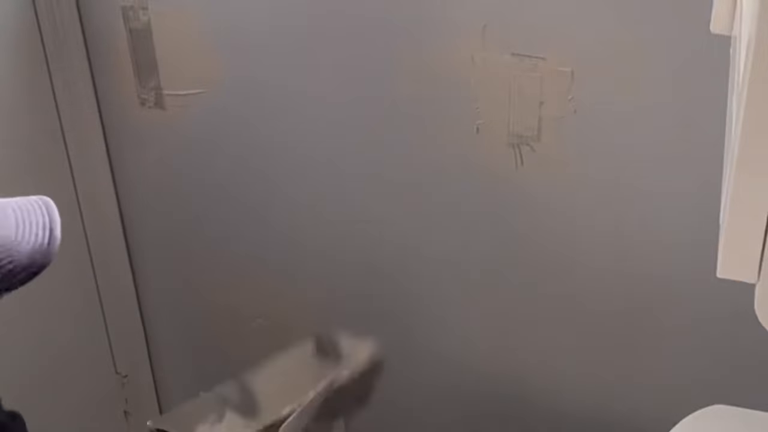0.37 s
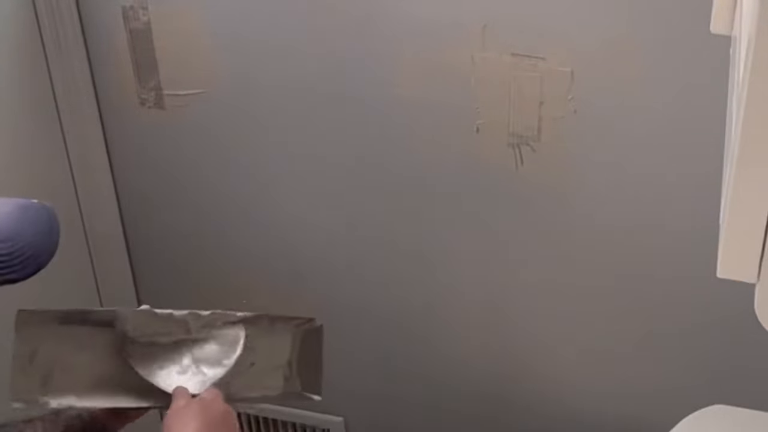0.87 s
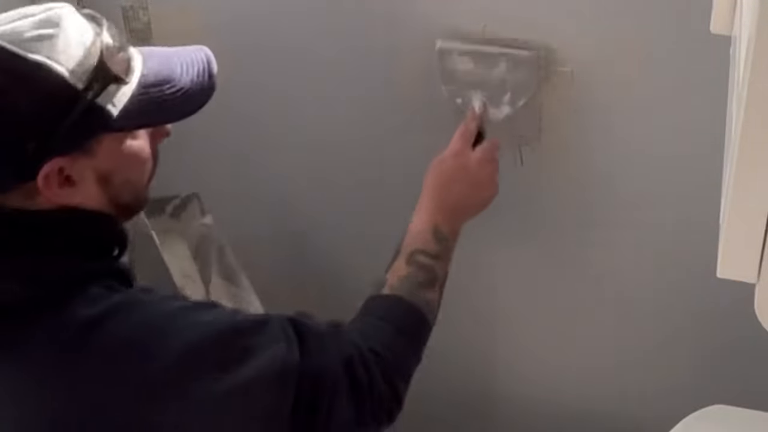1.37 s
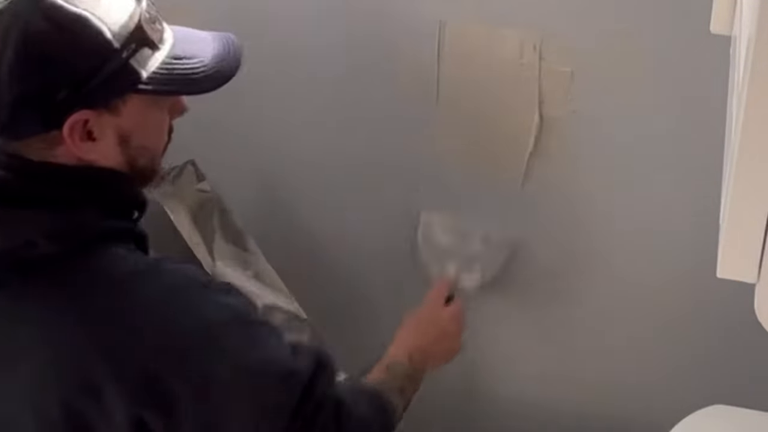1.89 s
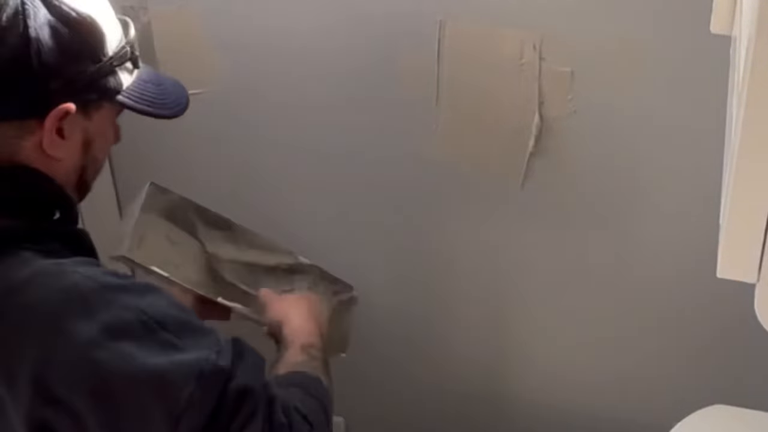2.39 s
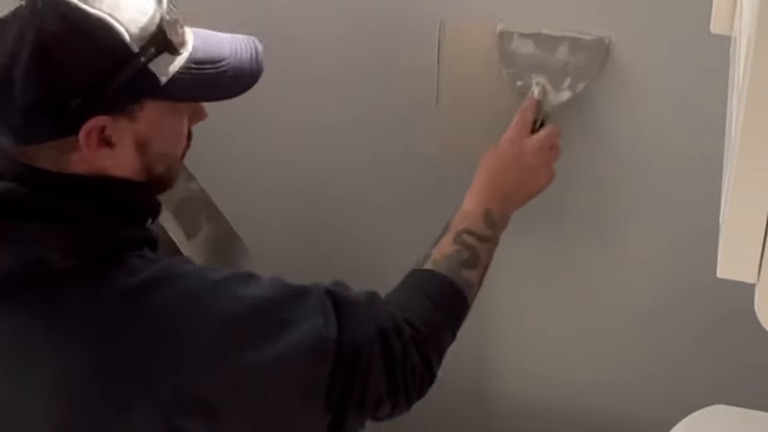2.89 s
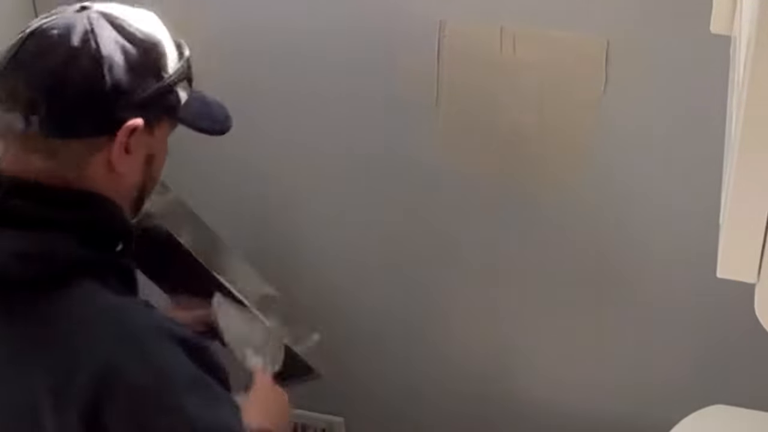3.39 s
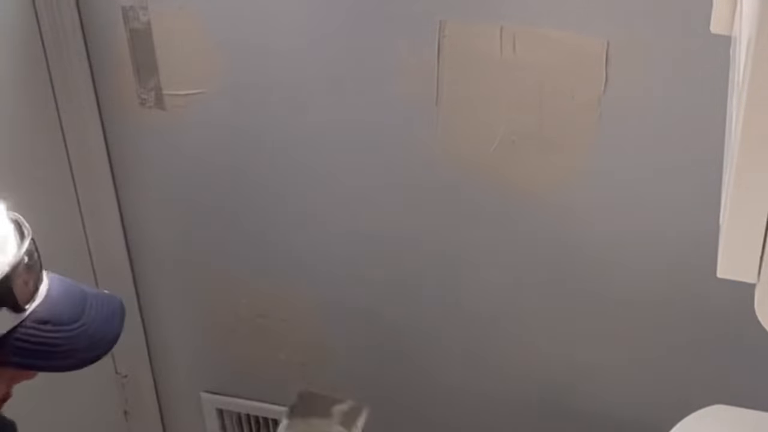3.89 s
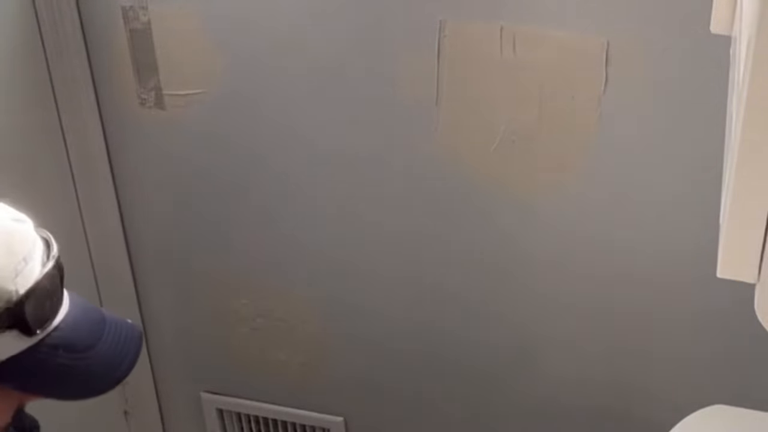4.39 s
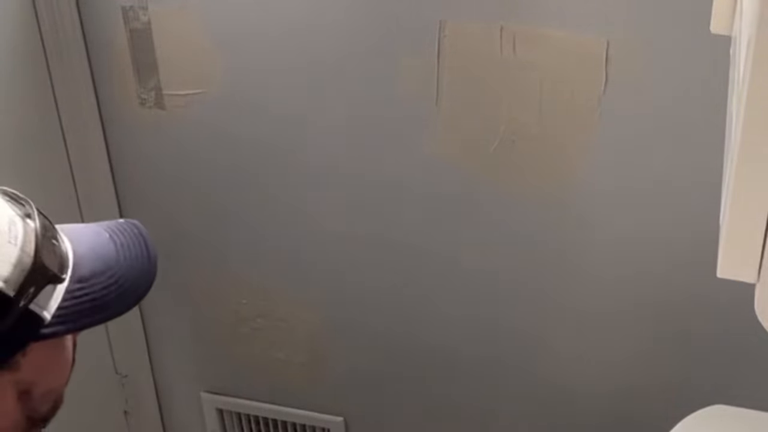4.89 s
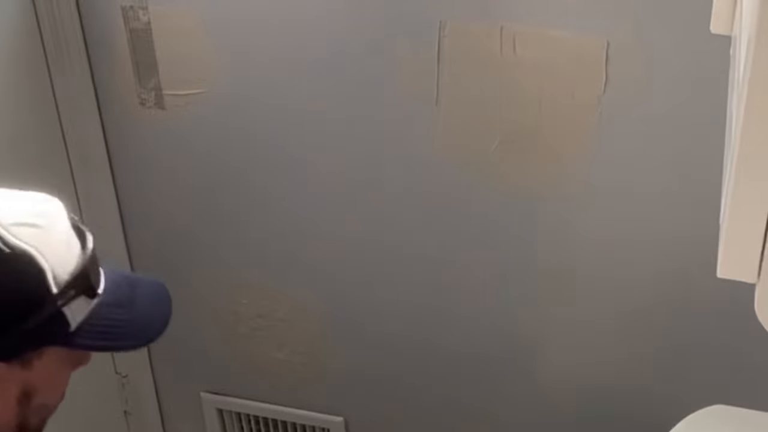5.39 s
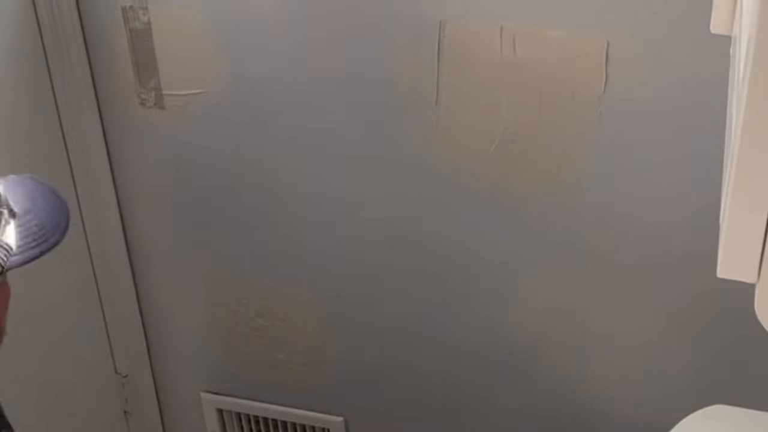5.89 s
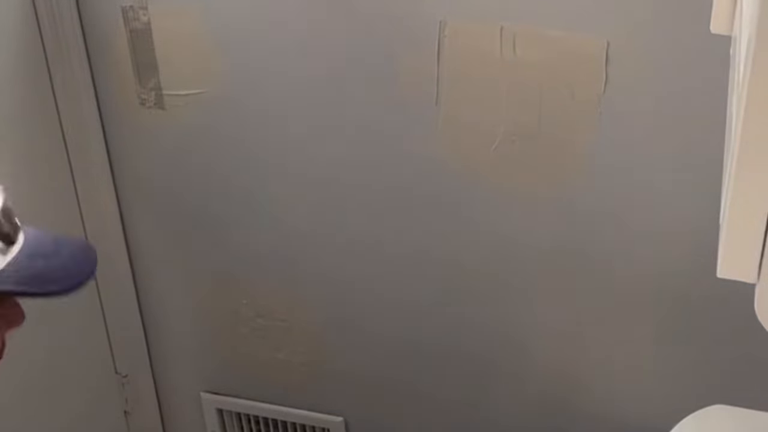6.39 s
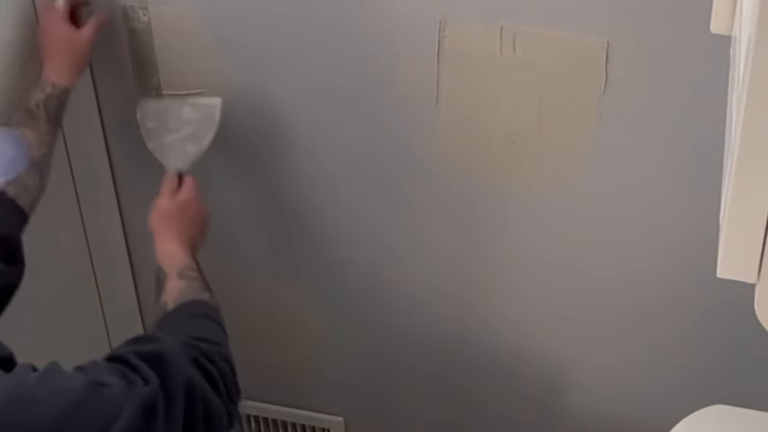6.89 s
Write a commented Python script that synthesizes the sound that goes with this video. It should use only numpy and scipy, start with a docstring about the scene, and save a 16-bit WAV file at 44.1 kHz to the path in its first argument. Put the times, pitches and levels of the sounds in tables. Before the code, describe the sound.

In a small hard room at double speed, a metal knife gives faint scrapes, then short gritty rasps and tinny knocks against a sheet-metal pan. The strokes grow louder and crowd together around three to four seconds, with one very sharp clack. Dull thuds follow, then a stretch of sleeve rustle, and a final burst of scrapes and taps. Low house hum and slight hiss lie underneath; close stereo microphone.

```python
"""A steel filling knife scrapes a wall and the rim of a sheet-metal mud pan in a small hard room, in short strokes.
Grit under the blade is a train of random clicks that hisses, and that drives the resonances of blade and pan.
The edge also strikes and squeaks; noise bursts through low resonances make the floor thud and a knock in the wall.
Sleeves rustle as coloured noise, and steady noise makes the hum and hiss of the house.
All is heard at double speed: short pieces are played and as many are skipped, so levels move in steps."""
import sys
import numpy as np
from scipy import signal
from scipy.fft import rfft, irfft, next_fast_len
from scipy.io import wavfile
from scipy.ndimage import uniform_filter1d

SR = 44100
rng = np.random.default_rng(int(sys.argv[2]) if len(sys.argv) > 2 else 0)


def decibels_to_gain(level_db):
    """Convert a level in decibels to a linear amplitude gain (20 dB per decade)."""
    exponent = np.asarray(level_db, float) / 20
    return 10 ** exponent


def generate_wav(signal):
    """Clip the signal to [-1, 1] and save it as 16-bit WAV at the path in sys.argv[1]."""
    frames = np.transpose(np.atleast_2d(signal))
    scaled = np.clip(frames, -1, 1) * 32767
    pcm = np.round(scaled).astype(np.int16)
    wavfile.write(sys.argv[1], SR, pcm)


N = 309582  # samples heard
LONG = 2 * N + SR  # samples of unhurried time, before pieces are skipped
PIECE, FIRST = .0442, .035  # s: length of each played piece, time of the first join


def knife():
    """Friction as excitation: grit under the blade hisses and drives blade and pan; the edge strikes and squeaks."""
    # Resonances of the blade. Each row: frequency in Hz, width in Hz, relative level in dB.
    blade_modes = [(1510, 22, -7.5), (2184, 37, -6), (3400, 84, 3), (3490, 13, -13), (3600, 98, 1),
                   (4030, 120, 3), (3860, 27, -34), (4600, 38, -14.5)]
    # Spectra of grit and of the fizz above it. Each row: frequency in Hz, relative level in dB per Hz.
    grit_spectrum = [(180, -37.5), (300, -6), (733, -5.5), (951, -1.5), (1360, 1.5), (2170, -3),
                     (2520, -5.5), (4030, -3), (8000, -13.5), (10400, -52.5), (17600, -120)]
    fizz_spectrum = [(5000, -46.5), (7500, 1), (10000, 9), (12000, -5), (15500, 0.5), (16600, -37),
                     (17200, -120)]
    grit, fizz, ring, favoured_hz = strokes()
    force = grains(per_s=2500, scatter_db=3.0, smooth=0.7)
    hiss = coloured(force, grit_spectrum) + 0.09 * resonant(force, blade_modes)
    rub = grit * patchy(hiss, depth_db=2.5) + fizz * coloured(force, fizz_spectrum)
    push = ring * grains(per_s=500, scatter_db=-1.0, smooth=0.24)
    cracks, shoves = strikes()
    return rub + cracks + squeaks() + pan(push + shoves, favoured_hz.clip(400), reach=0.62)


def strokes():
    """Envelopes of the friction force: gains of grit, fizz and pan push, and the favoured pan pitch."""
    # Blade strokes. Each row: start in seconds, swell in seconds, hold in seconds, grit level in dB,
    # pan push in dB re grit, fizz in dB re grit, favoured pan pitch at the start in Hz.
    stroke_rows = [(0.084, 0.0046, 0.055, -65.5, 1, -8.5, 1050),
                   (0.164, 0.0066, .005, -47.5, -5.5, -18.5, 1200),
                   (0.296, 0.0026, 0.0037, -53.5, 6, -21, 640), (0.96, .003, 0.019, -38.5, 6.5, -12.5, 800),
                   (0.98, 0.011, 0.0038, -35, 5.5, -5.5, 720), (1.003, 0.038, 0.023, -41, -8.5, -6.5, 800),
                   (1.856, 0.034, 0.0038, -30.5, -7, -14, 960), (1.968, 0.0089, 0.12, -58.5, 2, -19.5, 890),
                   (2.014, 0.0033, 0.0068, -28.5, 3.5, -11, 650),
                   (2.373, .008, 0.043, -57, 11.5, -13.5, 874), (2.436, 0.023, 0.053, -37, -1.5, -4, 880),
                   (3.085, .075, .005, -56, -12.5, -12, 1060),
                   (3.171, 0.031, 0.0022, -40.5, -9, -7.5, 1050),
                   (3.211, .012, 0.008, -23.5, -18.5, -23.5, 1050),
                   (3.348, .005, 0.0033, -29.5, 5, -22.5, 800), (3.358, .006, 0.005, -19.5, 2, -14.5, 656),
                   (3.435, .01, .04, -55, -6.5, -9.5, 645), (3.548, .006, 0.022, -26, 0.5, -8, 930),
                   (3.911, 0.0023, 0.011, -32, 1, -12.5, 725), (3.939, 0.041, 0.037, -34.5, -10, -5, 700),
                   (4.042, .02, 0.026, -38, -8, -9.5, 520), (4.117, .004, 0.013, -52.5, 11, -26, 700),
                   (4.175, 0.024, 0.0038, -38.5, -1.5, -18.5, 700),
                   (4.275, 0.011, 0.018, -49.5, 11, -9.5, 450), (6.046, 0.0088, .005, -38, -4.5, -9, 700),
                   (6.119, 0.0023, .005, -45.5, 5.5, -32, 635), (6.146, .01, 0.051, -62, 7.5, -7, 645),
                   (6.219, .003, 0.012, -36.5, 4.5, -14, 637), (6.265, 0.029, 0.0043, -35, -1.5, -6, 820),
                   (6.444, 0.0066, 0.042, -46.5, 9, -18, 675), (6.481, .01, .005, -28.5, -1, -10.5, 636),
                   (6.609, 0.0073, 0.0214, -61, -14, -3, 800),
                   (6.882, 0.0022, 0.0027, -46.5, 5.5, -21, 1160)]
    swell_from_db, lift_db_per_s = -12.5, 249.5  # touch-down under the full stroke; fading as the blade lifts
    landing_db, landing_s = 3, 0.021  # the pan is pushed harder just as the blade lands
    slide_oct_per_s = 2.5  # the favoured pitch sinks as the blade slides in from the rim
    grit, fizz, ring = np.zeros((3, LONG))
    favoured_hz = np.full(LONG, 800.)
    for start, swell, hold, db, ring_db, fizz_db, hz in stroke_rows:
        first, shape_db = gesture(start, swell, hold, swell_from_db, lift_db_per_s)
        t = np.arange(len(shape_db)) / SR
        span = slice(first, first + len(shape_db))
        gain = decibels_to_gain(db + shape_db)
        grit[span] += gain
        fizz[span] += gain * decibels_to_gain(fizz_db)
        ring[span] += gain * decibels_to_gain(ring_db + landing_db * np.exp(-t / landing_s))
        favoured_hz[span] = hz * 2 ** (-slide_oct_per_s * t)
    return grit, fizz, ring, favoured_hz


def strikes():
    """Impact: each blow of the edge is a decaying noise crack and an impulsive push on the pan."""
    # Blade edge strikes. Each row: time in seconds, crack peak in dB, pan push in dB re that peak
    # (the gain of the push pulse below).
    strike_rows = [(0.9656, -22, -1), (0.9978, -32, -16), (2.0201, -12, 14.5), (2.0246, -17, 10.5),
                   (2.4427, -17.5, 5), (3.3618, -9, 4.5), (3.5534, -15, 17.5), (3.5688, 1.5, 0),
                   (3.918, -21, 10), (4.0582, -16.5, -7), (4.1234, -44.5, 17), (4.2891, -38.5, 19),
                   (6.121, -38.5, -17), (6.2235, -25.5, 13), (6.4899, -18, 7), (6.8867, -45, 9)]
    cracks, shoves = np.zeros((2, LONG))
    t = np.arange(SR // 50) / SR
    shove = t / 0.00019 * np.exp(1 - t / 0.000069)  # one short push on the sheet
    for s, db, pan_db in strike_rows:
        crack = decibels_to_gain(-60 * t / 0.0075) * (1 - np.exp(-t / 0.00015)) * rng.standard_normal(len(t))
        cracks[unhurried(s):][:len(t)] += decibels_to_gain(db) * crack / np.abs(crack).max()
        shoves[unhurried(s):][:len(t)] += decibels_to_gain(db + pan_db) * shove
    return cracks, shoves


def squeaks():
    """Narrow-band resonance: a brief swell of noise through one mode gives each small squeak of the blade."""
    # Squeaks. Each row: start in seconds, length in seconds, pitch in Hz, level of the driving noise in dB.
    squeak_rows = [(1.452, .04, 3650, -75), (1.63, .07, 1100, -60)]
    sound = np.zeros(LONG)
    for s, length, hz, db in squeak_rows:
        swell = np.hanning(round(length * SR))
        drive = decibels_to_gain(db) * swell * rng.standard_normal(len(swell))
        sound[unhurried(s):][:len(swell)] += resonant(drive, [(hz, 60, 0)])
    return sound


def pan(force, favoured_hz, reach):
    """Modal excitation: contact drives modes near one pitch most; neighbours move in opposite phase."""
    # Resonances of the sheet-metal pan. Each row: frequency in Hz, width in Hz, relative level in dB.
    pan_modes = [(454, 60, -11), (449.7, 28, -8.5), (572.6, 50, -6), (687.5, 88, -8.5), (800, 77, -7),
                 (912, 47, -6), (1129, 86, -2)]
    ring = np.zeros(LONG)
    for k, mode in enumerate(pan_modes):
        share = np.exp(-(np.log(favoured_hz / mode[0]) / reach) ** 2)
        ring += (-1) ** k * resonant(force * share, [mode], top_hz=2580)
    return filtered(ring, lambda f: (1j * f / (1j * f + 300)) ** 2)  # thin sheet radiates little bass


def thuds():
    """Structure-borne sound: soft lumpy pushes boom in the floor's modes and knock in the wall's."""
    # Weight shifts and tools set down. Each row: start in seconds, swell in seconds,
    # drive of the floor boom in dB, drive of the dull knock in dB.
    thud_rows = [(0.099, .04, -57.5, -49), (0.169, .02, -63, -46), (1.875, .02, -58, -39),
                 (2.014, 0.018, -48, -43.5), (3.217, .02, -64.5, -46.5), (3.354, .022, -47, -34.5),
                 (3.548, 0.032, -49, -33), (3.91, 0.082, -37.5, -28.5), (4.05, 0.017, -34.5, -35),
                 (4.19, .02, -41, -43.5), (4.285, 0.012, -43, -36), (4.95, 0.025, -60.5, -50.5),
                 (5.231, .022, -54, -49), (6.123, 0.044, -38, -52), (6.217, 0.043, -45, -36.5),
                 (6.443, 0.018, -45, -56), (6.487, .02, -42, -39.5), (6.883, 0.0049, -47, -33),
                 (6.905, 0.018, -40.5, -37)]
    # Resonances of floor and wall. Each row: frequency in Hz, width in Hz, relative level in dB.
    floor_modes = [(45, 5.4, -11), (73, 7, 6)]
    wall_modes = [(186, 78, 1), (230, 36, 4), (320, 97, 1.5)]
    boom_from_db, boom_db_per_s = -4.5, 223  # the floor swells, then settles
    knock_s, knock_db_per_s = .01, 350.5  # the knock is brief
    boom_gain, knock_gain = np.zeros((2, LONG))
    for start, swell, boom_db, knock_db in thud_rows:
        first, shape_db = gesture(start, swell, 0, boom_from_db, boom_db_per_s)
        boom_gain[first:][:len(shape_db)] += decibels_to_gain(boom_db + shape_db)
        first, shape_db = gesture(start, 0, knock_s, 0, knock_db_per_s)
        knock_gain[first:][:len(shape_db)] += decibels_to_gain(knock_db + shape_db)
    boom_force = boom_gain * grains(per_s=120, scatter_db=-2.0, smooth=1.0)
    knock_force = knock_gain * grains(per_s=570, scatter_db=-0.2, smooth=0.37)
    return resonant(boom_force, floor_modes, top_hz=151) + resonant(knock_force, wall_modes, top_hz=600)


def sleeves():
    """Fibre friction: coloured grain noise follows each rub of cloth; a stronger rub is slightly duller."""
    # Sleeves and slow handling. Each row: start in seconds, swell in seconds, hold in seconds,
    # rustle level in dB before mixing.
    rub_rows = [(0, .001, 0.037, -69.5), (0.21, 0.016, .04, -68), (0.35, 0.091, 0.27, -70.5),
                (1.117, 0.037, 0.12, -69), (1.272, .02, 0.071, -74), (1.49, 0.0045, 0.042, -59.5),
                (1.574, 0.0045, .04, -65.5), (1.689, .004, 0.025, -69.5), (1.754, .01, 0.14, -70),
                (2.776, 0.039, 0.024, -74), (2.952, 0.0049, 0.038, -60), (4.328, 0.028, .03, -63.5),
                (4.44, .16, 0.024, -55.5), (4.65, 0.012, .06, -67), (4.72, 0.044, .09, -59),
                (4.86, 0.076, 0.0211, -55), (5.071, 0.023, .03, -54), (5.119, 0.027, 0.038, -48),
                (5.208, .01, .13, -57.5), (5.36, 0.0099, .07, -63.5), (5.45, 0.044, 0.048, -58),
                (5.58, .03, 0.015, -57), (5.66, 0.0093, 0.116, -75), (5.869, .005, 0.077, -64.5),
                (6.705, 0.097, 0.084, -70.5), (6.93, 0.011, .08, -66)]
    # Spectrum of rubbed cloth. Each row: frequency in Hz, relative level in dB per Hz.
    cloth_spectrum = [(180, -32.5), (300, 5.5), (398, -2), (1280, 2), (8220, -7), (11700, -11.5),
                      (12700, -54), (16000, -23)]
    rub_from_db, rub_db_per_s = -6.5, 199  # a rub starts softer and fades
    neutral_db, bright_exponent = -57.5, -0.0578  # level of unchanged colour; negative: louder is duller
    rustle = np.full(LONG, 1e-6)
    for start, swell, hold, db in rub_rows:
        first, shape_db = gesture(start, swell, hold, rub_from_db, rub_db_per_s)
        rustle[first:][:len(shape_db)] += decibels_to_gain(db + shape_db)
    bright = (rustle / decibels_to_gain(neutral_db)) ** bright_exponent
    force = grains(per_s=8100, scatter_db=3.0, smooth=0.74)
    rub = patchy(coloured(force, cloth_spectrum), depth_db=2.0)
    dull = filtered(rub, lambda hz: 1 / (1 + (hz / 2500) ** 2))
    return rustle * (dull / bright + (rub - dull) * bright)


def room(x, far_db, far_t60):
    """Reverberation: the walls' answer dies by frequency, over a longer one from the house.
    It is drawn afresh every third of an unhurried second, so that no one pattern of echoes colours all the sounds."""
    # Reverberation of the walls. Each row: frequency in Hz, 60 dB decay time in seconds.
    wall_t60 = [(80, 0.1), (500, 0.16), (3000, 0.13), (10000, 0.11)]
    step = SR // 3
    parts = np.pad(x, (0, -LONG % step)).reshape(-1, 1, step)
    hz, t, z = signal.stft(rng.standard_normal((len(parts), 2, SR * 3 // 4)), SR, nperseg=256)
    walls = decibels_to_gain(-60 * t / along(wall_t60, hz)[:, None])
    house = decibels_to_gain(far_db - 60 * t / far_t60) / (1 + (hz[:, None] / 5000) ** 2)
    tails = signal.istft(z * (walls + house), SR, nperseg=256)[1]
    answers = signal.fftconvolve(parts, tails / np.linalg.norm(tails[0, 0]), axes=2)
    wet = np.zeros((2, LONG + 2 * SR))
    for k, answer in enumerate(answers):
        wet[:, k * step + 150:][:, :answer.shape[1]] += answer  # 150 samples of delay before the answer
    return diffuse(wet[:, :LONG])


def air():
    """Stationary noise: the steady hum and hiss of the house, diffuse at the ports."""
    # Spectrum of the air. Each row: frequency in Hz, relative level in dB per Hz.
    air_spectrum = [(15, -34.5), (25, -6), (141, -5), (200, -15), (242, -5), (277, -17), (463, -20),
                    (714, -21.5), (775, -22.5), (1290, -36.5), (10700, -47), (14800, -45.5), (16000, -47)]
    return decibels_to_gain(-61.5) * diffuse(coloured(rng.standard_normal((2, LONG)), air_spectrum))


def direct(x, lag_s):
    """Time difference of arrival: straight to the ports, lag_s later at the left one."""
    return filtered(x, lambda f: np.exp(1j * np.pi * f * lag_s * np.array([[-1], [1]])))


def diffuse(pair):
    """Diffuse-field coherence: two unrelated signals become mid and side at the ports."""
    # Diffuse sound at the two ports. Each row: frequency in Hz, side minus mid in dB.
    side_over_mid = [(60, -12), (120, -17.5), (240, -7.5), (480, 5), (950, 1.5), (1890, 0.5), (3770, 1.5),
                     (7520, -1), (15000, 6.5)]
    mid = pair[0]
    side = filtered(pair[1], lambda hz: decibels_to_gain(along(side_over_mid, hz)))
    return np.array([mid + side, mid - side])


def hurried(x, fade_s):
    """Time compression by splicing: every second piece is skipped; neighbours cross-fade at the joins."""
    n = np.arange(N)
    place = (n / SR - FIRST) / PIECE + .5
    join = np.floor(place)  # the nearest join
    mix = np.clip((place - join - .5) * PIECE / fade_s + .5, 0, 1) * np.pi / 2
    before, after = (x[:, n + np.round((join + k) * PIECE * SR).astype(int)] for k in (0, 1))
    return np.cos(mix) * before + np.sin(mix) * after  # constant power


def unhurried(s):
    """Inverse of the splicing: sample of unhurried time that is heard at s seconds."""
    skipped = np.floor((s - FIRST) / PIECE) + 1
    return np.round((s + skipped * PIECE) * SR).astype(int)


def gesture(start, swell, hold, from_db, fall_db_per_s):
    """Exponential growth and decay: first sample and dB shape of swell, hold and fall per unhurried second."""
    first, full, end = unhurried(np.cumsum([start, max(swell, .001), max(hold, 0)]))
    gone = end + round(60 / fall_db_per_s * SR)
    return first, np.interp(np.arange(first, min(gone, LONG)), [first, full, end, gone], [from_db, 0, 0, -60])


def grains(per_s, scatter_db, smooth):
    """Shot noise: sparse clicks of uneven size over smooth noise, rms 1."""
    struck = rng.random(LONG) < per_s / SR
    size = decibels_to_gain(scatter_db * rng.exponential(size=LONG)) * rng.standard_normal(LONG)
    return unit(unit(struck * size) + smooth * rng.standard_normal(LONG))


def patchy(x, depth_db):
    """Random modulation: bands swell and sink as the rubbing contact changes; rms 1."""
    z = signal.stft(x, nperseg=512)[2]
    field = uniform_filter1d(rng.standard_normal(z.shape), size=8, axis=0)
    field = uniform_filter1d(field, size=8, axis=1)
    return unit(signal.istft(z * decibels_to_gain(depth_db * unit(field)), nperseg=512)[1][:LONG])


def resonant(x, modes, top_hz=16000):
    """Modal superposition: (Hz, width, dB) modes of alternating sign; soft contact cuts above top_hz."""
    passed = np.sqrt(np.pi * sum(width for hz, width, db in modes) / SR)  # white noise keeps its power at 0 dB

    def response(f):
        bells = 0
        for k, (hz, width, db) in enumerate(modes):
            damping = 1j * f * width
            bells = bells + (-1) ** k * decibels_to_gain(db) * damping / (hz * hz - f * f + damping)
        return bells / passed / (1 + 1j * f / top_hz) ** 2

    return filtered(x, response)


def coloured(x, spectrum):
    """Spectral shaping: x with the (Hz, dB) colour, rms 1."""
    return unit(filtered(x, lambda hz: decibels_to_gain(along(spectrum, hz))))


def filtered(x, response):
    """Linear filtering: the spectrum of x times a complex response of frequency."""
    m = next_fast_len(LONG)
    return irfft(rfft(x, m) * response(np.fft.rfftfreq(m, 1 / SR)), m)[..., :x.shape[-1]]


def along(points, hz):
    """Interpolation of (Hz, value) points on a logarithmic frequency axis."""
    f, v = np.transpose(points)
    return np.interp(np.log(hz + 1), np.log(f + 1), v)


def unit(x):
    """Normalisation to rms 1."""
    return x / np.sqrt(np.mean(x ** 2) + 1e-20)


def scene():
    """Superposition: knife, sleeves and thuds, direct and in the room, over the air, at double speed."""
    steel, cloth, floor = knife(), sleeves(), thuds()
    near = direct(steel, lag_s=0.00044) + 0.67 * direct(cloth, lag_s=0.00003) + floor
    reverberant = decibels_to_gain(-1.0) * room(steel + cloth + floor, far_db=-28.5, far_t60=1.1)
    return hurried(near + reverberant + air(), fade_s=0.0031)


def band_limit(x):
    """A steep low-pass at the top of the band."""
    return signal.sosfilt(signal.butter(12, 16840, fs=SR, output="sos"), x)


def record(dry):
    """Transducer response and saturation: the two ports differ in colour, the loudest peaks are rounded off."""
    # Colour of the two ports. Each row: frequency in Hz, left minus right in dB.
    left_over_right = [(60, 0.5), (120, 0.5), (240, -3), (480, 2.5), (950, -1), (1890, 0.5), (3770, -7.5),
                       (7520, -1.5), (15000, 2.5)]
    x = filtered(dry, lambda hz: decibels_to_gain(along(left_over_right, hz) * np.array([[.5], [-.5]])))
    x = x / (1 + np.abs(x / .9) ** 4) ** (1 / 4)
    return band_limit(x)


dry = scene()
out = record(dry)
generate_wav(out)
```